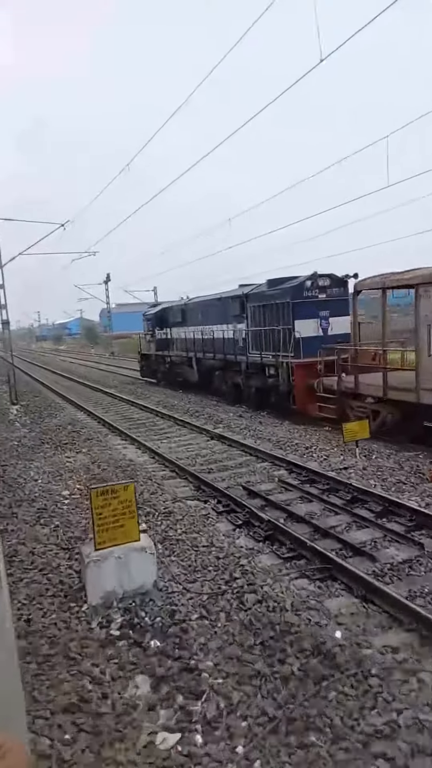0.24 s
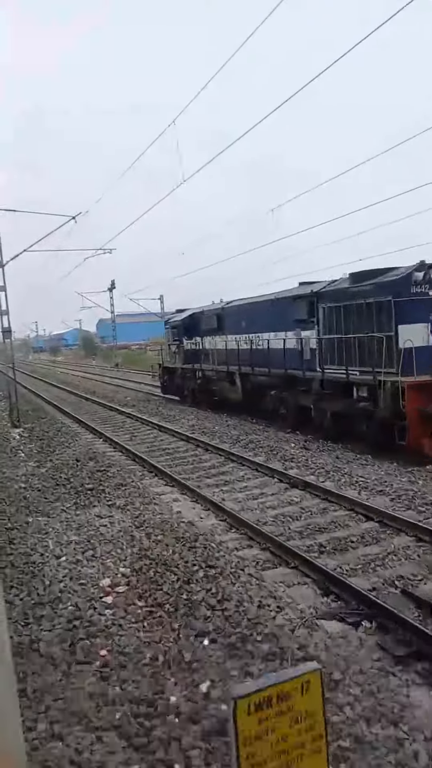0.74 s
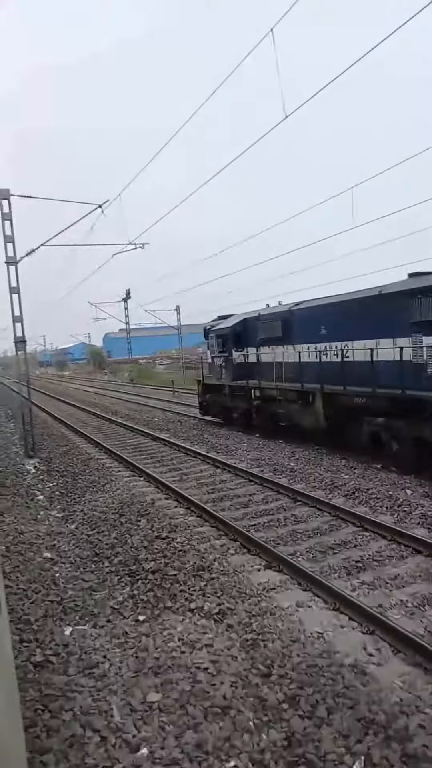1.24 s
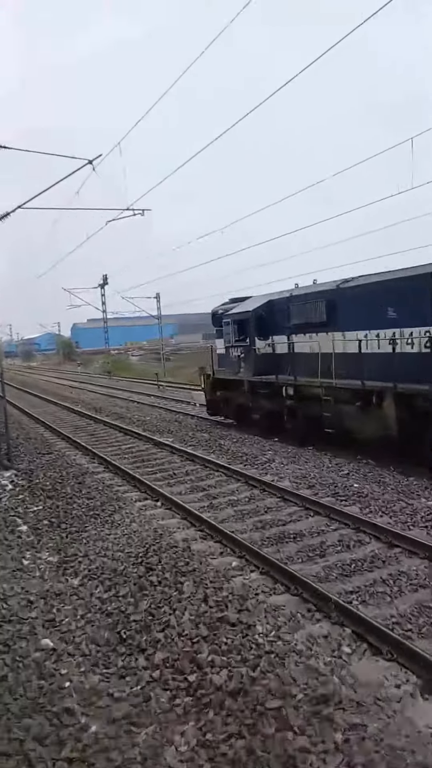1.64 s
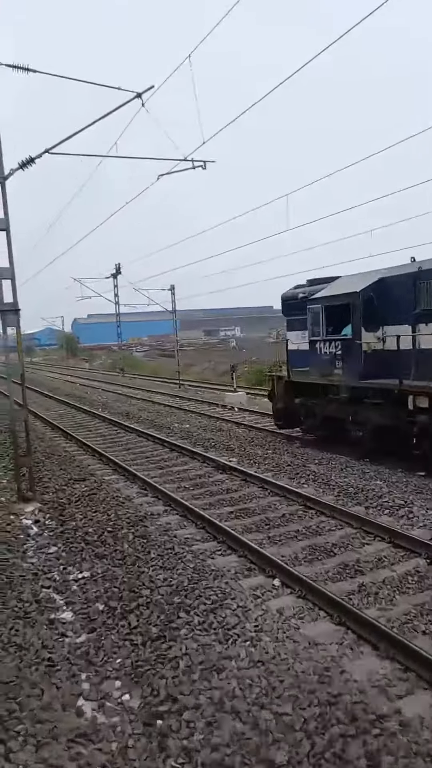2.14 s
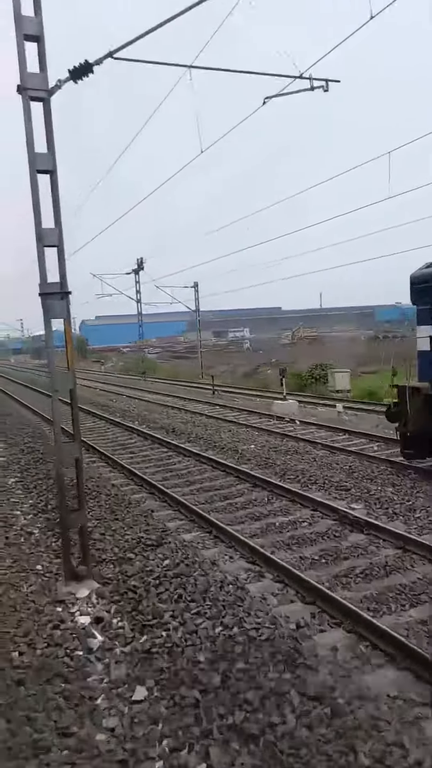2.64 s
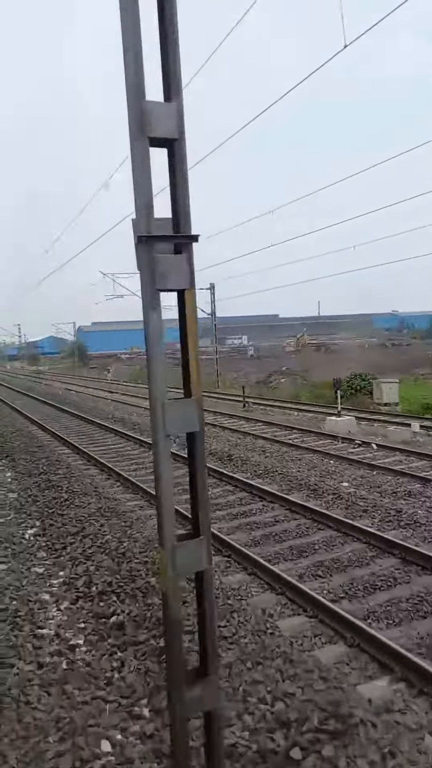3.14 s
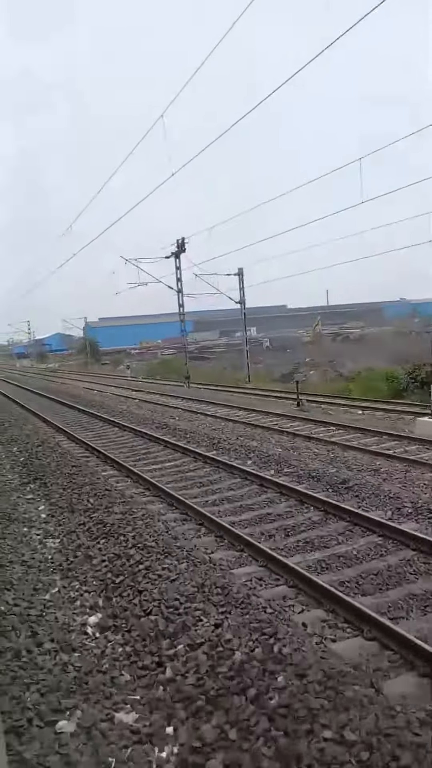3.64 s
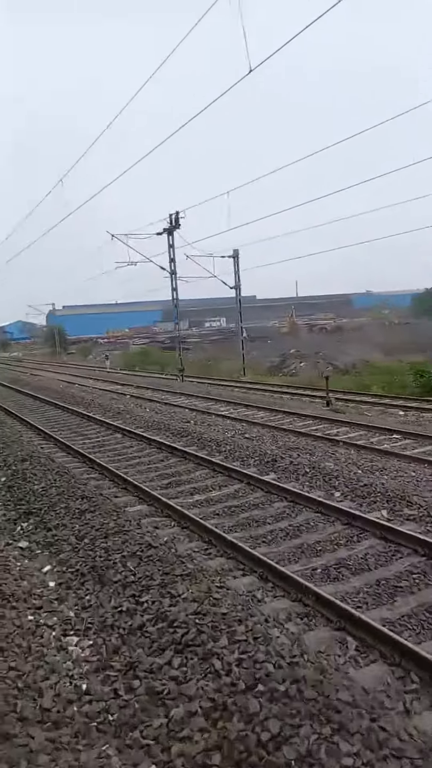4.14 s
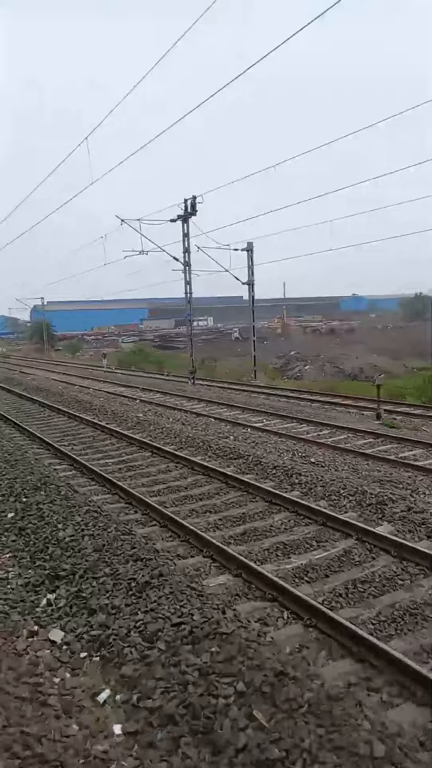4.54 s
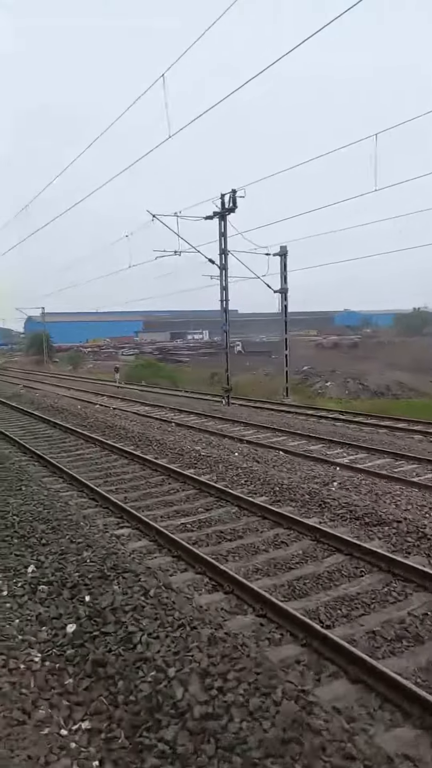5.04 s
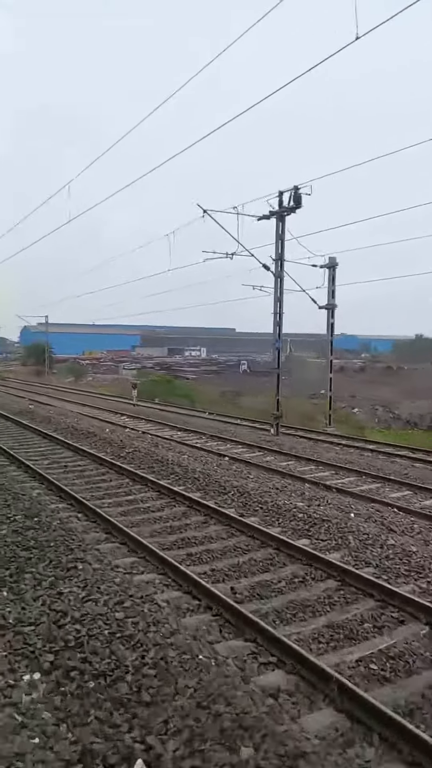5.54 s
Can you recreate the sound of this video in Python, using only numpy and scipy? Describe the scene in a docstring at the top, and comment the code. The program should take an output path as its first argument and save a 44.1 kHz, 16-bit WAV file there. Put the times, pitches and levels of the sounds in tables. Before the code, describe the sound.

Rough train ride with roaring wind, thudding jolts and metallic rattles, a thin high wheel squeal, and one brief air horn blast near the end.

```python
"""At the open door of a moving train: wind buffets the microphone over rolling wheels, jolts, knocks and
rattles. In the first seconds wheels clang on the rail and wind roars in the microphone port; each source is
built below. From about 2.8 s the wheel flanges, which scrape now and then throughout, also ring and squeal on a
curve. At 4.7 s a two-tone air horn gives a short blast; its direct sound gives way to the yard's reflection.
The wind, wheels and jolts carry on to the end. Noise makes the rough sounds, sine waves the pitched ones."""
import sys
import numpy as np
from scipy import signal
from scipy.fft import rfft, irfft
from scipy.io import wavfile

SR = 44100
rng = np.random.default_rng(int(sys.argv[2]) if len(sys.argv) > 2 else 0)


def inscribe(sig):
    """Save sig as 16-bit PCM at rate SR to the path in sys.argv[1].

    A 1-D sig is mono; a 2-D sig holds one channel per row.
    Samples are clipped to [-1, 1] before scaling.
    """
    pcm = np.round(np.clip(np.atleast_2d(sig).T, -1, 1) * 32767)
    wavfile.write(sys.argv[1], SR, pcm.astype(np.int16))


N = 255780
TIME = np.arange(N) / SR
HZ = np.fft.rfftfreq(N, 1 / SR)

# In all tables levels are before any trim in the function; colours give relative levels.

# level of the low wind buffeting, which sinks while the horn sounds: (t/s, level/dB)
BUFFET_LEVEL = [(0, -17.5), (.7, -21.5), (2.2, -19.5), (2.8, -23), (3.28, -20), (3.42, -29), (3.62, -24),
                (4.05, -26.5), (4.62, -21.5), (4.9, -35.5), (5.04, -30), (5.8, -22.5)]
# colour of the low buffeting: (f/Hz, level/dB)
BUFFET_COLOUR = [(15, -9), (40, -49), (65, -5), (110, 0), (150, -1), (185, -3.5), (235, 0), (300, -5),
                 (420, -10.5), (600, -10), (900, -14.5), (2000, -43), (6000, -61)]
# wind rushing and resonating in the microphone port: (t/s, level/dB)
RUSH_LEVEL = [(0, -25.5), (.6, -25), (1.6, -24.5), (1.8, -23.5), (2.35, -23), (2.55, -23.5), (3.3, -25)]
# colour of that rush: (f/Hz, level/dB)
RUSH_COLOUR = [(100, -5), (330, 3), (450, 1), (580, -7), (700, 6), (790, 8.5), (900, 5), (1050, -6),
               (1400, -55), (2500, -17), (5000, -24), (12000, -59)]
RUSH_END_S, RUSH_FALL_S = 3.315, 0.017


def slipstream(buffet_db=-2, slap_db=-5, shared_db=2.5, local_db=3.5, throb_db=3, waver_db=2):
    """Eddies swell the low buffeting and the rush together; some hit each microphone port alone."""
    shared = shared_db * wander(slow_hz=3.6, fast_hz=36.6)
    local = local_db * wander(slow_hz=1.7, fast_hz=70, channels=2)
    eddies = unit(amp(shared + local))
    churn = eddies * noise(colour(BUFFET_COLOUR), likeness=0.24)
    lumps = slaps(per_s=55, spread_db=4, gain=colour(BUFFET_COLOUR))
    throb = np.tanh(wander(slow_hz=12, fast_hz=15))  # large eddies, a dozen or so a second
    buffet_gain = amp(curve(BUFFET_LEVEL) + buffet_db + throb_db * throb)
    buffet = buffet_gain * unit(churn + amp(slap_db) * lumps) * pan(db=-0.5)
    exposed = np.exp(-np.maximum(TIME - RUSH_END_S, 0) / RUSH_FALL_S)
    rush_gain = amp(curve(RUSH_LEVEL) + surges(axis=2) + waver_db * throb) * exposed
    rush = rush_gain * noise(colour(RUSH_COLOUR), likeness=0.3)
    return buffet + rush * unit(eddies ** 0.39)  # the rush follows the eddies less strongly


def slaps(per_s, spread_db, gain):
    """Single soft-edged eddies slap the ports, some harder on one side than on the other."""
    strength = amp(spread_db * np.minimum(rng.exponential(1, N), 2))
    strikes = (rng.random(N) < per_s / SR) * strength * rng.choice([-1, 1], N)
    sides = 1 + rng.uniform(-1.1, 1, (2, N))
    softness = 1 / (1 + (HZ / 420) ** 2)
    return unit(irfft(rfft(strikes * sides) * causal(gain * softness), N))


# wheels rolling on the rails: (t/s, level/dB)
ROLLING_LEVEL = [(0, -29.5), (.8, -32), (1.15, -31.5), (2.1, -29), (2.7, -30.5), (3.55, -30.5), (3.85, -35),
                 (4.3, -27.5), (5.25, -37), (5.8, -36)]
# colour of the wheels, also used for the clank of a jolt: (f/Hz, level/dB)
ROLL_COLOUR = [(100, 7), (450, 3), (850, -5), (1200, 4), (1450, 3), (1700, -1), (2050, 2.5), (2400, -5),
               (3000, -11), (4200, -16), (5200, -24.5), (8000, -25.5), (15000, -34.5)]


def rolling(roll_db=3, flutter_db=0.4, surge_db=1.57):
    """Rough rail shakes the wheels in surges; each stretch of the spectrum swells a little on its own."""
    spectrum = rfft(noise(colour(ROLL_COLOUR), likeness=0.39, lead_ms=0.21))
    centres = np.geomspace(500, 6000, num=9)
    shares = np.eye(len(centres))
    bands = [irfft(spectrum * np.interp(HZ, centres, share), N) for share in shares]
    roar = sum(band * amp(1.7 * wander(slow_hz=1, fast_hz=16)) for band in bands)
    flutter = flutter_db * wander(slow_hz=7.2, fast_hz=80)
    shake_db = flutter + surge_db * wander(slow_hz=4.7, fast_hz=14)
    return amp(curve(ROLLING_LEVEL) + roll_db + surges(axis=3)) * unit(roar * amp(shake_db))


# a flange scrapes along the rail: (start t/s, length t/s, level/dB)
SCRAPES = [(0, 0.3, -43.5), (.45, 0.1, -34.5), (.64, 0.13, -36.5), (1.04, 0.13, -37.5), (1.74, 0.13, -34),
           (2.09, 0.13, -31.5), (2.29, 0.054, -36), (2.75, .3, -32.5), (3.34, 0.076, -34), (3.55, 0.1, -37),
           (3.82, 0.32, -33.5), (4.12, 0.25, -28.5), (5.0, 0.31, -35), (5.55, 0.059, -34),
           (5.72, 0.027, -27)]
# colour of the scraping: (f/Hz, level/dB)
SCRAPE_COLOUR = [(1500, 10.5), (3500, 6), (5200, 3), (7000, 0.5), (8500, 2), (10500, -1), (12200, 3.5),
                 (13500, -3), (15000, -3.5), (16000, -58)]
SCRAPE_RISE_S, SCRAPE_FALL_S = 0.056, 0.035
# between scrapes a faint hiss; entering the curve adds a second share to it
CURVE_START_S, CURVE_ENTRY_S, STRAIGHT_HISS_DB, CURVE_EXTRA_HISS_DB = 2.86, 0.13, -47, -44
# a flange rubs a wheel mode into ringing: (start t/s, length t/s, f/Hz, width f/Hz, level/dB)
RUBS = [(2.85, .19, 6080, 130, -35), (2.81, .18, 11900, 400, -39.5), (2.86, .16, 12950, 450, -40),
        (2.74, 1.66, 4860, 100, -45.5), (3.824, 0.56, 6060, 180, -37), (3.82, 0.57, 12200, 300, -40),
        (3.84, 0.47, 12900, 510, -40.5), (4.18, .22, 13080, 220, -43), (5.08, 0.093, 5960, 99, -38),
        (5.06, 0.083, 12300, 600, -40), (5.3, 0.63, 6100, 230, -45.5), (5.12, .68, 13000, 420, -46.5)]
RUB_RISE_S, RUB_FALL_S = 0.087, 0.11
# the wheel locks into a squeal: (start t/s, length t/s, level/dB)
SQUEALS = [(2.81, 0.485, -38.5), (3.38, 0.95, -40), (3.61, 0.054, -31), (4.0, 0.13, -35.5),
           (4.35, 0.21, -36.5), (4.54, 0.055, -27), (5.48, 0.077, -44), (5.62, 0.15, -45)]
SQUEAL_RISE_S, SQUEAL_FALL_S = 0.02, 0.015
# the squeal's middle pitch, and the one moment when it sags
SQUEAL_HZ, SLIP_S, SLIP_LENGTH_S, SLIP_SAG_HZ = 4835, 4.525, 0.15, 120
# fuzzy upper octave of the squeal: (t/s, f/Hz before drift, level/dB)
OCTAVE = [(2.75, 9600, -75), (2.86, 9700, -46), (3.08, 9700, -43), (3.33, 9700, -47.5), (3.46, 9580, -41),
          (3.65, 9600, -57), (4.28, 9500, -51), (4.53, 9500, -53), (4.6, 9360, -43), (4.65, 9420, -80)]
OCTAVE_WIDTH_HZ = 150


def flanges():
    """Flanges hiss along the rail, rub the wheel modes, and lock one of them into a wavering squeal."""
    chatter = unit(amp(1.5 * wander(slow_hz=3.8, fast_hz=200, channels=2)))
    return (scrape() + rubbed_modes() + squeal() + squeal_octave()) * chatter * pan(db=1.5)


def scrape():
    """Metal sliding on metal: bright noise with a randomly uneven spectrum."""
    hiss = amp(STRAIGHT_HISS_DB) + amp(CURVE_EXTRA_HISS_DB) * ramp(CURVE_START_S, CURVE_ENTRY_S)
    contact = np.hypot(hiss, strokes(SCRAPES, SCRAPE_RISE_S, SCRAPE_FALL_S))
    gain = colour(SCRAPE_COLOUR) * random_ripple(ripple_db=3.5)
    return contact * noise(gain, likeness=0.043, lead_ms=0.166)


def rubbed_modes(catch_db=2.5):
    """Rubbing feeds single wheel modes, each caught and released on its own, as narrow noise."""
    out = np.zeros((2, N))
    for start, length, hz, width_hz, db in RUBS:
        level = amp(db + catch_db * wander(slow_hz=4.1, fast_hz=30))
        gate = stroke(start, length, RUB_RISE_S, RUB_FALL_S)
        out += level * gate * noise(resonance(hz, width_hz), likeness=0.37, lead_ms=0.22)
    return out


def squeal(squeal_db=-1, flicker_db=3.5):
    """The wheel locks into one mode, played as a sine with unsteady pitch and grip."""
    sag = SLIP_SAG_HZ * stroke(SLIP_S, SLIP_LENGTH_S, SQUEAL_RISE_S, SQUEAL_FALL_S)
    pitch = SQUEAL_HZ - sag + 8 * wander(slow_hz=1, fast_hz=8)
    turns = np.cumsum(pitch + 15 * wander(slow_hz=8, fast_hz=120)) / SR
    lag_s = np.array([[0], [.00025]])  # the right port is farther from the wheel
    wobble = wander(slow_hz=2, fast_hz=18) + 0.69 * wander(slow_hz=8, fast_hz=30, channels=2)
    grip = 2 * np.tanh(wobble / 2)
    tone = np.sin(2 * np.pi * (turns - pitch * lag_s))
    level = amp(squeal_db) * strokes(SQUEALS, SQUEAL_RISE_S, SQUEAL_FALL_S)
    return level * unit(tone * amp(flicker_db * grip))


def squeal_octave(drift_hz=30):
    """The squeal's upper octave is a narrow, drifting band of noise."""
    pitch = curve(OCTAVE) + drift_hz * wander(slow_hz=3, fast_hz=18)[0]
    return amp(curve(OCTAVE, axis=2)) * moving(pitch, OCTAVE_WIDTH_HZ, likeness=0.46, lead_ms=0.23)


def random_ripple(ripple_db, spacing_hz=70):
    """Gain with a random ripple across the spectrum."""
    knots = rng.standard_normal(1000)
    return amp(ripple_db * np.interp(HZ / spacing_hz, np.arange(len(knots)), knots))


# partials of the high bell: (multiple of the pitch, early level/dB, late level/dB)
HIGH_BELL = [(1, -6, -8), (2, 0, 1), (3, 3.5, 0.5), (4, 2, 0), (5, 2.5, 1), (6, -8, -5), (7, -7.5, 4.5),
             (8, -9.5, -9.5), (9, -12.5, -14), (10, -15.5, -13.5), (11, -17, -16), (12, -17.5, -18),
             (13, -20, -21), (14, -28, -21), (15, -26, -18), (16, -31, -29), (20, -23, -18), (24, -40, -36),
             (35, -40, -34)]
# partials of the low bell: (multiple of the pitch, early level/dB, late level/dB)
LOW_BELL = [(1, -22, -18), (2, -8.5, -13), (3, -1.5, 0), (4, -6, -4.5), (5, -11, -8.5), (6, 0, -4),
            (7, -2, 2), (8, -10, -9), (9, -12, -10), (10, -9, -7), (11, -14, -12), (13, -20, -11),
            (14, -21, -18), (17, -21, -18), (23, -31, -25), (29, -17.5, -20), (35, -31, -27.5),
            (50, -31, -35)]
# partials of the overblown note: (multiple of the pitch, level/dB)
OVERBLOWN = [(1, -15), (2, -7), (3, -7), (4, -12), (5, -1), (6, -11), (7, -20), (9, -16), (15, -32)]
# both bells, and the overblown note the low one starts on: (start t/s, length t/s, level/dB)
HIGH_BLAST, LOW_BLAST, OVERBLOWN_BLAST = (4.706, 0.443, -16.5), (4.758, 0.4, -18.3), (4.714, 0.06, -16.5)
HORN_RISE_S, HORN_FALL_S, HORN_FADE_DB_PER_S = 0.022, 0.02, 29.5
# final pitches; all glide down to them from a sharp start as the horn goes by
HIGH_HZ, LOW_HZ, OVERBLOWN_HZ, GLIDE_SHARE, GLIDE_S = 421, 296.4, 315, 0.024, 0.068
# meanwhile the balance of the partials shifts from early to late
TURN_S, TURN_LENGTH_S = 4.79, 0.097


def horn(air_db=-12):
    """Two bells about six semitones apart; the low one first rasps on an overblown note. Air hisses along."""
    glide = 1 + GLIDE_SHARE * np.exp(-(np.maximum(TIME - HIGH_BLAST[0], 0) / GLIDE_S) ** 1.4)
    high = bell(HIGH_HZ * glide, HIGH_BELL, HIGH_BLAST, jitter=.0065)
    low = bell(LOW_HZ * glide, LOW_BELL, LOW_BLAST, jitter=.008)
    rasp = bell(OVERBLOWN_HZ * glide, OVERBLOWN, OVERBLOWN_BLAST, jitter=.018)
    hiss = noise(resonance(hz=1800, width_hz=1700), likeness=0.13)
    air = amp(air_db) * blowing(*HIGH_BLAST) * hiss
    return (high + low + rasp + air) * pan(db=1)


def bell(pitch, partials, blast, jitter, onset_dull_db=8, brighten_s=0.014):
    """A reed buzzing into a flared bell; shifting reflections make each partial swell and fade."""
    turns = np.cumsum(pitch * (1 + jitter * wander(slow_hz=60, fast_hz=260)[0])) / SR
    on = slice(int(blast[0] * SR), int((blast[0] + .6) * SR))
    # dB per octave: low air pressure gives a round tone at first
    dullness_db = onset_dull_db * np.exp(-(TIME[on] - blast[0]) / brighten_s)
    partials = np.array(partials)
    multiples, early, late = np.round(partials[:, 0]), partials[:, 1], partials[:, -1]
    turned = ramp(TURN_S, TURN_LENGTH_S)[on]
    fading = 1 + ramp(HIDDEN_S, HIDDEN_LENGTH_S)[on] / 2  # the reflected sound is more ragged
    out = np.zeros((2, N))
    for k in range(1, round(multiples[-1]) + 1):
        knots = rng.standard_normal((2, 1, 28)) + .8 * rng.standard_normal((2, 2, 28))
        drift = signal.resample(knots, SR * 2 // 3, axis=2)[..., :len(turned)]
        swell, shift = np.sqrt(k) * drift  # short waves fade the most
        # multiples missing from the table lie between their neighbours
        balance_db = (1 - turned) * np.interp(k, multiples, early) + turned * np.interp(k, multiples, late)
        swell_db = 6 * np.tanh(.85 * fading * swell / 6) - .1 * fading * np.sqrt(k)
        level = amp(balance_db + swell_db - dullness_db * np.log2(k / 2))
        phase = 2 * np.pi * (k * turns[on] + rng.random())
        out[:, on] += level * np.sin(phase + .23 * shift + rng.uniform(-.7, .7, (2, 1)))
    return blowing(*blast) * out


def blowing(start, length, db):
    """Loudness of one bell: the valve opens, the air pressure runs down, the valve shuts."""
    pressure_db = db - HORN_FADE_DB_PER_S * np.maximum(TIME - start, 0)
    return amp(pressure_db) * stroke(start, length, HORN_RISE_S, HORN_FALL_S)


# colour of what the far side of the yard throws back: (f/Hz, level/dB)
ECHO_COLOUR = [(300, -13), (600, -2), (840, -10.5), (1200, 2), (1280, 0.5), (1500, -8), (2100, -5.5),
               (2600, -2), (2950, -15), (3300, -5), (4300, -7.5), (15000, -18)]
# the coach then hides the horn, and only its reflection reaches the door
HIDDEN_S, HIDDEN_LENGTH_S = 4.945, 0.072


def yard(x, blur_db=-2, blur_t60=0.28, tail_db=-8, tail_t60=0.4):
    """The direct sound gives way to a smeared reflection; masts and ballast scatter a soft tail."""
    hidden = ramp(HIDDEN_S, HIDDEN_LENGTH_S)
    thrown = rfft(x) * colour(ECHO_COLOUR)
    smeared = irfft(thrown * (1 + amp(blur_db) * scatter(blur_t60)), N)
    tail = irfft(thrown * scatter(tail_t60), N)
    return (1 - hidden) * x + hidden * smeared + amp(tail_db) * tail


def scatter(t60):
    """Spectrum of random reflections, different at each port, that fall 60 dB in t60 seconds."""
    hits = rng.standard_normal((2, SR)) * (rng.random((2, SR)) < 2000 / SR)
    taps = hits * amp(-60 * TIME[:SR] / t60)
    return rfft(taps / np.linalg.norm(taps[0]), N)


# jolts of the coach: (t/s, thud level/dB, thud f/Hz, clank level/dB)
JOLTS = [(0.004, -7.5, 149, -16.5), (0.098, -6, 210, -28), (0.462, -15, 190, -23), (0.488, -4.5, 273, -29),
         (0.698, -8, 133, -22), (0.8, -10, 135, -19), (1.068, -10.5, 288, -15), (1.14, -13, 118, -15.5),
         (1.21, -7, 151, -28), (1.354, -1.5, 93, -16), (1.375, -5.5, 200, -23), (1.555, -8, 258, -26),
         (1.614, -9, 200, -19.5), (1.679, -11, 233, -30), (1.715, -3.5, 126, -38), (1.93, -5, 234, -18),
         (2.031, -7, 237, -27), (2.105, -1, 180, -24), (2.15, -1, 125, -25), (2.253, -4, 152, -28),
         (2.285, -4, 140, -32), (2.348, -1, 116, -24), (2.411, -7, 121, -34), (2.482, -2, 144, -17),
         (2.555, -10, 140, -20), (2.734, -9, 132, -33), (2.894, -8, 117, -30), (3.056, -7, 86, -17),
         (3.296, -9, 237, -17), (3.576, -4, 139, -15), (3.89, -7.5, 113, -35), (4.061, -7, 223, -17),
         (4.114, -3.5, 110, -41), (4.156, -8, 151, -30), (4.429, -7, 89, -36), (4.475, -10, 120, -16.5),
         (4.701, -8, 242, -35), (5.071, -12.5, 176, -38), (5.241, -10.5, 188, -35), (5.321, -8, 115, -41)]


def jolts(thud_db=-6, clank_db=-5, thud_t60=0.1, clank_t60=0.17, rise_s=0.0019):
    """Each jolt is a few cycles of low thud in the coach body with a short clank of the running gear."""
    thud, clank = np.zeros((2, N)), np.zeros(N)
    skews = rng.choice([-1, 1], len(JOLTS)) * rng.uniform(.3, .8, len(JOLTS))  # opposite phase shifts
    for (s, level_db, thud_hz, metal_db), skew in zip(JOLTS, skews):
        on = slice(int(s * SR), int(s * SR) + SR // 2)
        age = TIME[on] - TIME[on][0]
        rise = 1 - np.exp(-age / rise_s)
        swing = np.sin(2 * np.pi * thud_hz * age + np.array([[skew], [-skew]]))
        thud[:, on] += rise * amp(level_db - 60 * age / thud_t60) * swing
        clank[on] += rise * amp(metal_db - 60 * age / clank_t60)
    metal = noise(colour(ROLL_COLOUR), likeness=0.31, lead_ms=0.65)
    return amp(thud_db) * thud + amp(clank_db) * clank * metal


# a wheel clangs on the rail: (t/s, level/dB, f/Hz)
CLANGS = [(0.135, -18, 777), (0.468, -16.5, 732), (1.143, -18, 703), (1.405, -22, 782), (1.8, -20, 770),
          (1.84, -16, 855), (2.02, -16, 812), (2.05, -14, 820), (2.147, -18, 844), (2.35, -19, 858)]
CLANG_RISE_S, CLANG_T60_S, OVERTONE_RATIO, OVERTONE_DB = 0.0053, 0.19, 2.5, -12.5


def clangs():
    """Wheels strike rough spots in the rail and ring briefly in a close pair of modes and an overtone."""
    age, out = TIME[:SR // 3], np.zeros((2, N))
    for s, db, hz in CLANGS:
        ring = np.zeros((2, len(age)))
        for ratio, mode_db in [(.985, 0), (1.025, -4), (OVERTONE_RATIO, OVERTONE_DB)]:
            phase = 2 * np.pi * (hz * ratio * age + rng.random())
            ring += amp(mode_db) * np.sin(phase + rng.uniform(-.8, .8, (2, 1)))
        shape = (1 - np.exp(-age / CLANG_RISE_S)) * amp(db - 60 * age / CLANG_T60_S)
        out[:, int(s * SR):][:, :len(age)] += ring * shape
    return out


# loose fittings knock: (t/s, level/dB)
KNOCKS = [(0.135, -17.5), (0.92, -23), (1.314, -18.5), (1.38, -21), (1.588, -24), (2.247, -24),
          (2.328, -23), (2.397, -23.5), (2.435, -21), (2.68, -22), (4.328, -26), (5.679, -24.5)]
# colour of the knocks: (f/Hz, level/dB)
KNOCK_COLOUR = [(100, -15), (450, 10), (800, 10.5), (1100, 1), (1400, 3.5), (2200, -6), (4500, -18),
                (9000, -34), (15000, -42)]


def knocks(knock_db=3, rise_s=.001, hold_s=0.0033, fall_s=0.007):
    """Loose fittings knock against the coach: short, dry and hollow."""
    blows = strokes([(s, hold_s, db) for s, db in KNOCKS], rise_s, fall_s)
    return amp(knock_db) * blows * noise(colour(KNOCK_COLOUR), likeness=0.48, lead_ms=0.19)


def rattle(rattle_db=-5, per_s=22, spread_db=4, ring_t60=0.023):
    """Small steel parts chatter at random, each at its own pitch, louder when the wheels roll louder."""
    age, out = TIME[:SR // 10], np.zeros((2, N))
    for hz in np.geomspace(1000, 4600, num=12):
        strength = amp(spread_db * np.minimum(rng.exponential(1, N), 2))
        taps = (rng.random(N) < per_s / SR) * strength
        tone = np.sin(2 * np.pi * hz * age + rng.uniform(-1.8, 1, (2, 1)))
        ring = tone * amp(-60 * age / ring_t60) / hz  # higher parts are weaker
        out += signal.oaconvolve(taps[None], ring, axes=1)[:, :N]
    return amp(curve(ROLLING_LEVEL) + rattle_db) * unit(out)


# resonances of coach, wheels and rail that swell up and die away:
# (start t/s, end t/s, f/Hz, width f/Hz before the skirts are sharpened, level/dB)
SWELLS = [(0, 1.297, 3770, 1100, -43.5), (0.0, 1.11, 430, 220, -33), (1.595, 2.558, 152, 91.5, -31),
          (1.6, 2.698, 2310, 350, -36), (1.7, 3.743, 1990, 260, -38.5), (1.76, 3.302, 820, 120, -34.5),
          (2.856, 3.02, 4380, 160, -32), (3.487, 4.503, 103, 80, -30), (3.8, 4.8, 420, 170, -37.5),
          (4.96, 5.16, 550, 200, -33), (3.906, 4.68, 1220, 110, -36), (5.153, 5.803, 1170, 200, -40)]


def swells(edge_s=0.089):
    """The changing track shakes one resonance after another into a fuzzy drone."""
    out = np.zeros((2, N))
    for start, end, hz, width_hz, db in SWELLS:
        gate = np.clip(np.minimum(TIME - start, end - TIME) / edge_s, 0, 1)
        sharpened = resonance(hz, width_hz) ** 1.63
        out += amp(db) * gate * noise(sharpened, likeness=0.48, lead_ms=0.15)
    return out * unit(amp(2 * wander(slow_hz=7.1, fast_hz=50)))


# brief surges of the roar: (start t/s, length t/s, rush lift level/dB, wheel lift level/dB)
SURGES = [(0.106, 0.041, 6.5, -3), (0.457, 0.084, 7, 0.5), (1.13, 0.066, -0.5, 5), (1.36, 0.071, -2.5, 3.5),
          (1.765, 0.099, 3.5, 3.5), (2.006, 0.093, 3.5, 2), (3.291, 0.026, 5.5, 3.5)]
SURGE_RISE_S, SURGE_FALL_S = 0.0055, 0.0047


def surges(axis):
    """Lift in dB of one part of the roar (rush or wheels) through its surges."""
    return sum(row[axis] * stroke(row[0], row[1], SURGE_RISE_S, SURGE_FALL_S) for row in SURGES)


# the whole roar dips briefly: (middle t/s, length t/s, depth level/dB)
LULLS = [(0.073, 0.045, 4.5), (0.41, 0.069, 2.5), (0.61, 0.06, 3.5), (0.756, 0.04, 6.5),
         (1.281, 0.052, 3.5), (1.49, 0.096, 2), (1.902, 0.021, 5.5), (2.23, 0.067, 4.5), (2.453, 0.11, 6),
         (2.716, 0.066, 2), (3.36, 0.081, 3.5), (5.695, 0.045, 7.5)]


def lulls():
    """Gain of the roar through its brief dips."""
    return amp(-sum(depth_db * hump(middle, length) for middle, length, depth_db in LULLS))


def amp(db):
    """Decibels to gain."""
    return 10 ** (np.asarray(db) / 20)


def unit(x):
    """Scales to rms 1, an average strength of one."""
    return x / np.sqrt(np.mean(x ** 2) + 1e-20)


def curve(rows, axis=1):
    """One column of a table, joined by straight lines, at every sample."""
    rows = np.asarray(rows)
    return np.interp(TIME, rows[:, 0], rows[:, axis])


def ramp(start, length):
    """Goes from 0 to 1 over the given stretch."""
    return np.clip((TIME - start) / max(length, 1 / SR), 0, 1)


def hump(middle, length):
    """A smooth bump of height 1."""
    return np.exp(-(2 * (TIME - middle) / length) ** 2)


def stroke(start, length, rise_s, fall_s):
    """Attack, hold and exponential release."""
    return ramp(start, rise_s) * np.exp(-np.maximum(TIME - start - length, 0) / fall_s)


def strokes(rows, rise_s, fall_s):
    """Gain of a series of strokes, each at its own level; the strongest one prevails."""
    gains = [amp(db) * stroke(start, length, rise_s, fall_s) for start, length, db in rows]
    return np.max(gains, axis=0)


def colour(points):
    """Gain at every frequency from (f/Hz, level/dB) points."""
    hz, db = np.transpose(points)
    return amp(np.interp(np.log(HZ + 1), np.log(hz), db))


def resonance(hz, width_hz):
    """Gain of a resonance with steep skirts and an energy that does not depend on its width."""
    return 1 / (1 + ((HZ - hz) / width_hz) ** 2) / np.sqrt(width_hz)


def causal(gain):
    """Spectrum of the shortest pulse with this colour that has nothing before its strike."""
    cepstrum = irfft(np.log(np.maximum(gain, 1e-5)), N)
    cepstrum[1:N // 2] *= 2  # fold the part before the strike onto the part after it
    cepstrum[N // 2 + 1:] = 0
    return np.exp(rfft(cepstrum))


def wander(slow_hz, fast_hz, channels=1):
    """Random drift of rms 1 between two rates."""
    band = HZ ** 2 / (HZ ** 2 + slow_hz ** 2) / (1 + (HZ / fast_hz) ** 2)
    return unit(irfft(rfft(rng.standard_normal((channels, N))) * band, N))


def noise(gain, likeness, lead_ms=0):
    """Coloured noise at two microphone ports; the part they share reaches the left one first."""
    left, other = rfft(rng.standard_normal((2, N)))
    c = np.clip(likeness, 0, 1)
    delayed = left * np.exp(-2j * np.pi * HZ * lead_ms / 1000)
    right = c * delayed + np.sqrt(1 - c ** 2) * other
    return unit(irfft(np.array([left, right]) * gain, N))


def moving(pitch, width_hz, likeness, lead_ms):
    """Noise in a narrow resonance that follows a pitch curve."""
    middle = np.mean(pitch)
    band = signal.hilbert(noise(resonance(middle, width_hz), likeness, lead_ms))
    return (band * np.exp(2j * np.pi * np.cumsum(pitch - middle) / SR)).real


def pan(db):
    """Port gains for a left-minus-right level."""
    return amp(np.array([[db], [-db]]) / 2)


def scene():
    """Wind, wheels and horn at the door; the lulls dip the roar but not the blows or the horn."""
    roar = lulls() * (slipstream() + rolling() + rattle() + swells() + flanges())
    return roar + jolts() + knocks() + clangs() + yard(horn())


def record(dry, bass_hz=50, edge_hz=15500):
    """The microphone sheds the deepest bass; then the full-scale limit and the band limit."""
    thinned = signal.lfilter(*signal.butter(2, bass_hz, "highpass", fs=SR), dry)
    band_limit = signal.firwin(511, edge_hz, window=("kaiser", 9), fs=SR)
    return signal.oaconvolve(np.clip(thinned, -1, 1), band_limit[None], "same")


dry = scene()
out = record(dry)
inscribe(out)
```